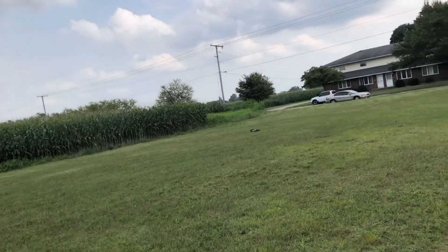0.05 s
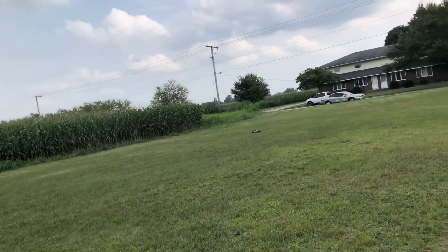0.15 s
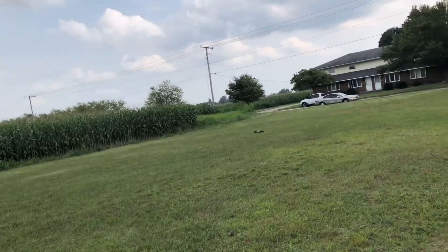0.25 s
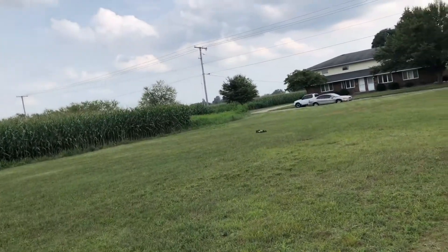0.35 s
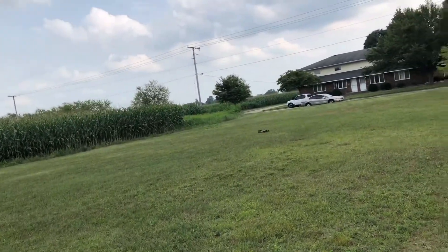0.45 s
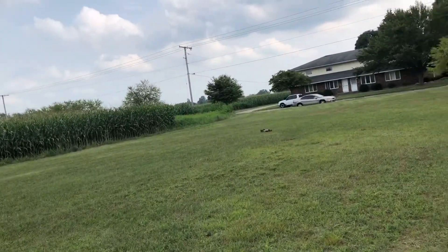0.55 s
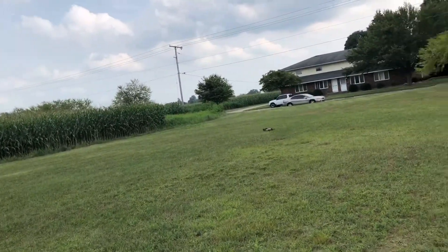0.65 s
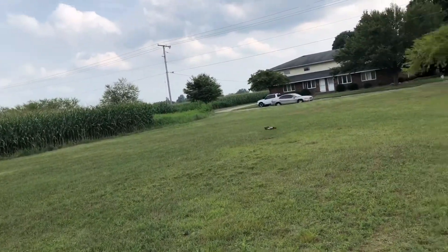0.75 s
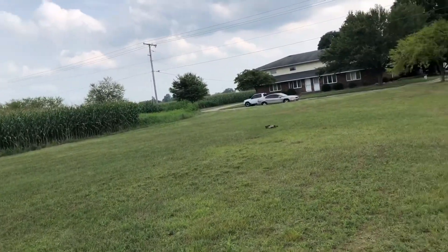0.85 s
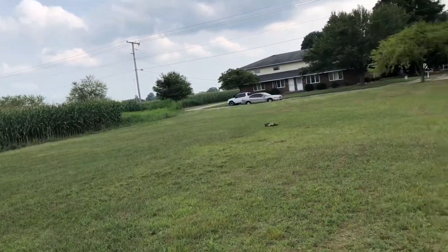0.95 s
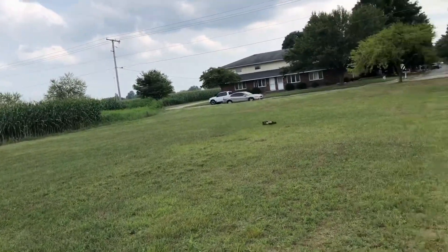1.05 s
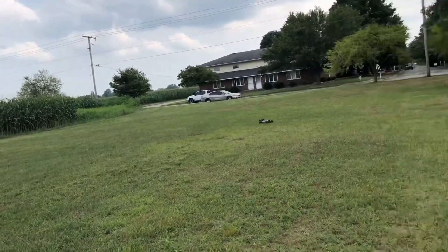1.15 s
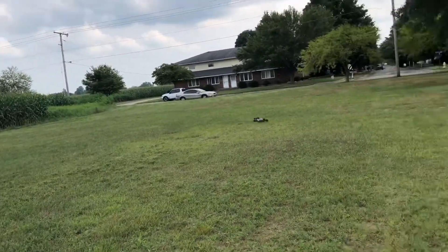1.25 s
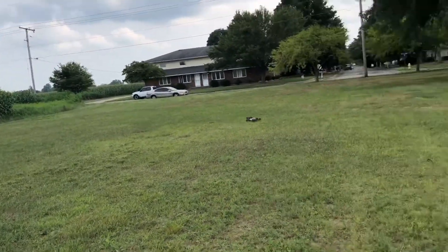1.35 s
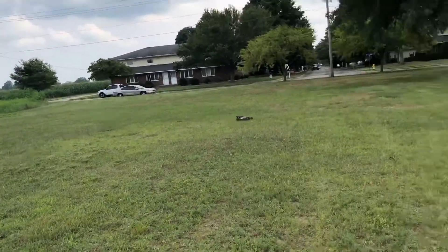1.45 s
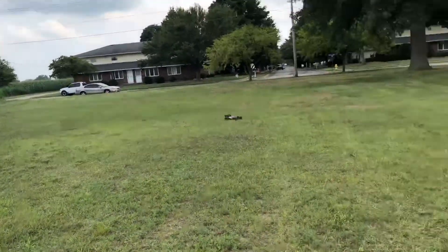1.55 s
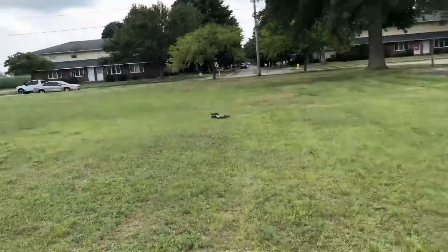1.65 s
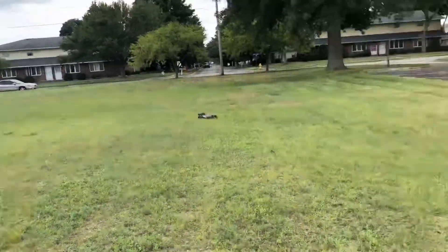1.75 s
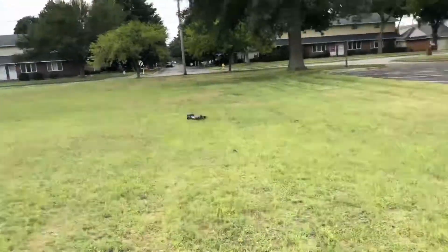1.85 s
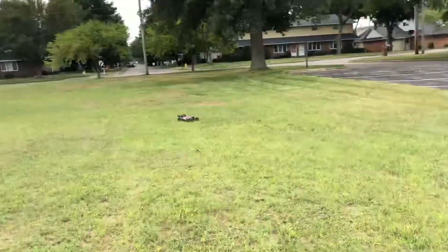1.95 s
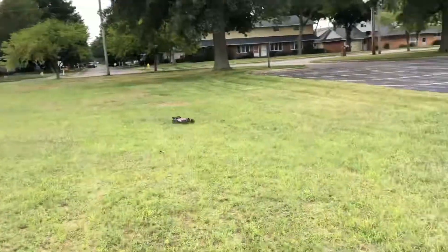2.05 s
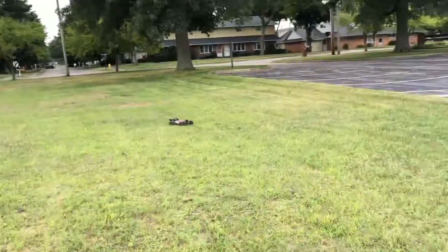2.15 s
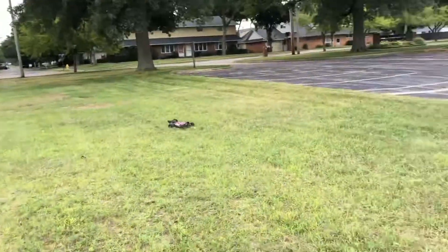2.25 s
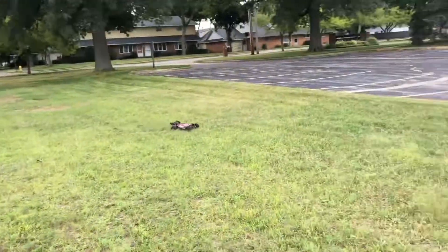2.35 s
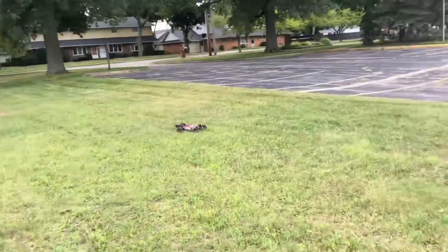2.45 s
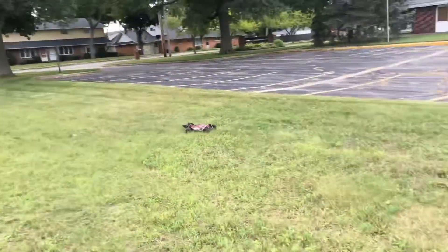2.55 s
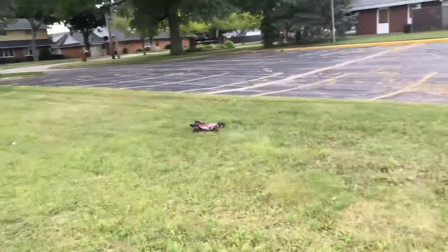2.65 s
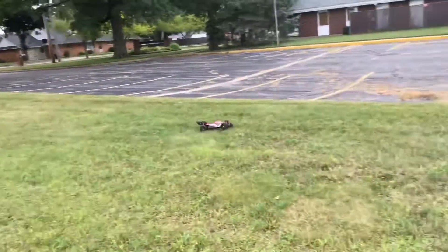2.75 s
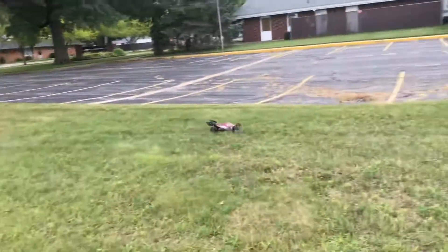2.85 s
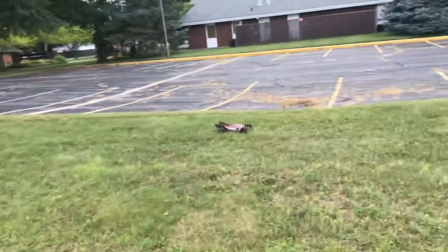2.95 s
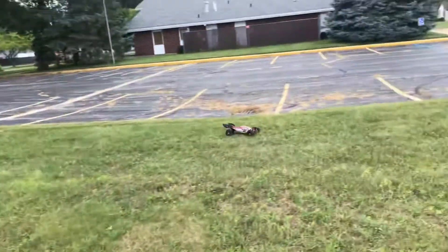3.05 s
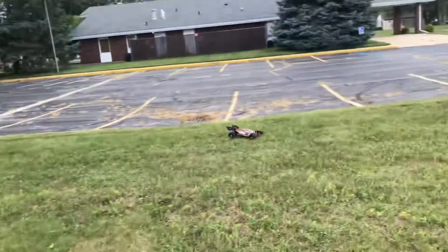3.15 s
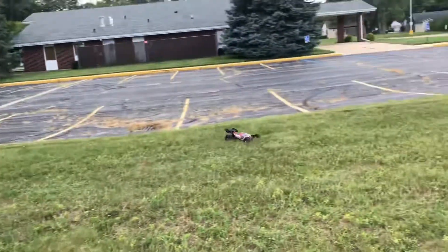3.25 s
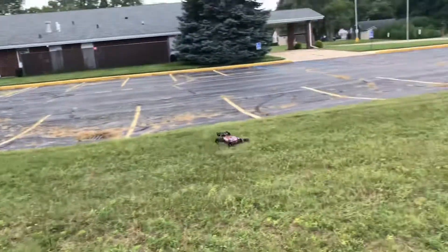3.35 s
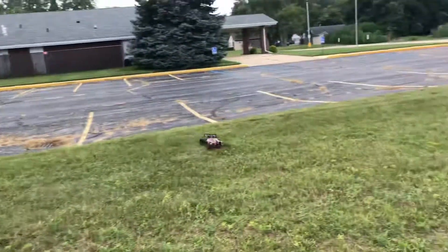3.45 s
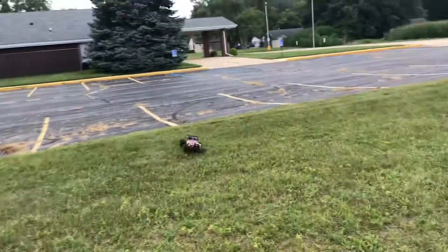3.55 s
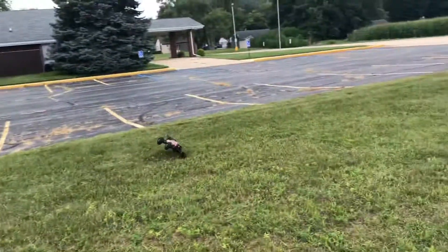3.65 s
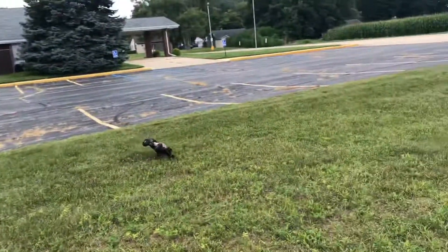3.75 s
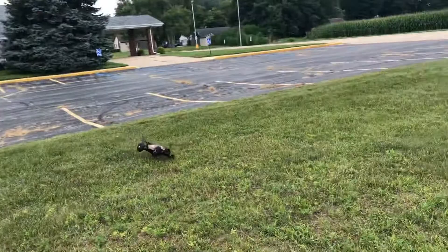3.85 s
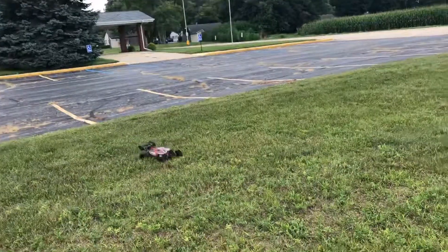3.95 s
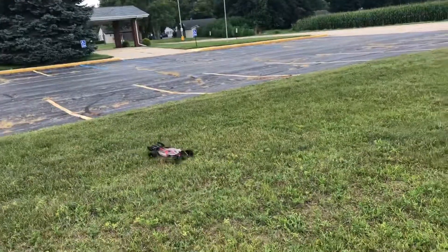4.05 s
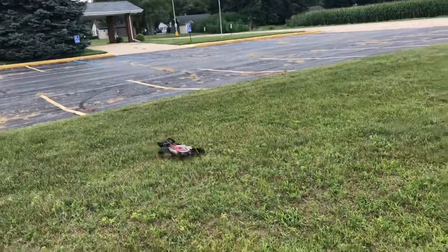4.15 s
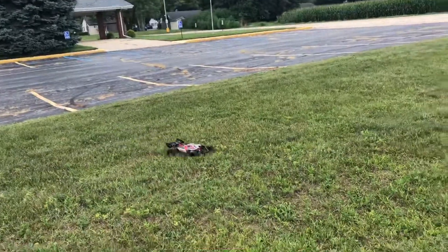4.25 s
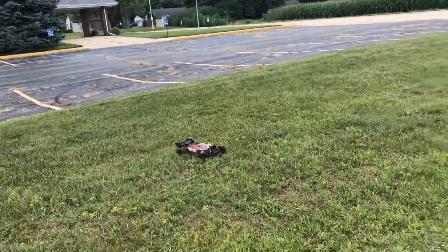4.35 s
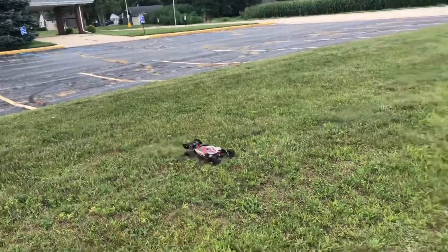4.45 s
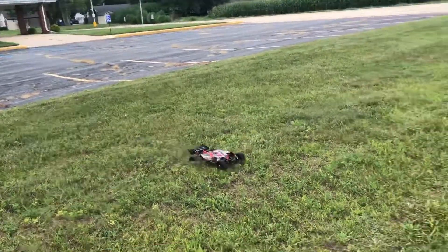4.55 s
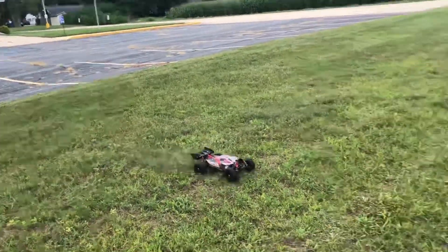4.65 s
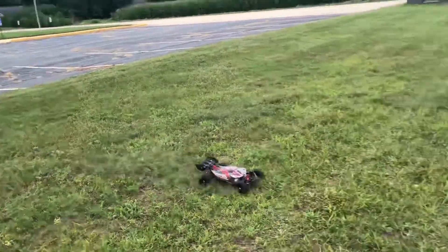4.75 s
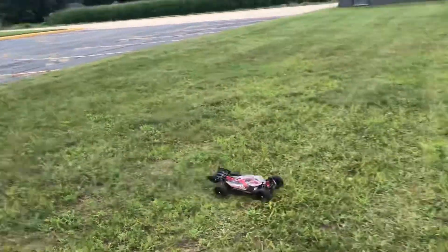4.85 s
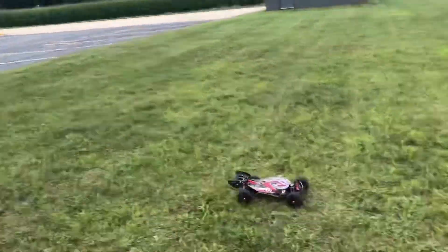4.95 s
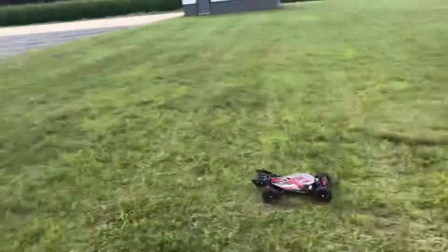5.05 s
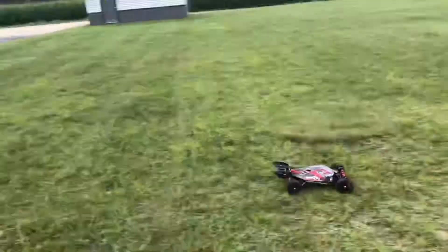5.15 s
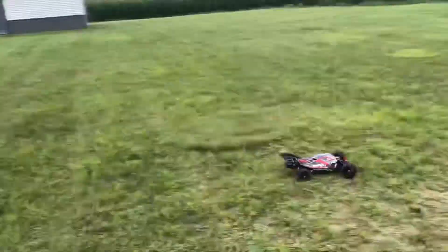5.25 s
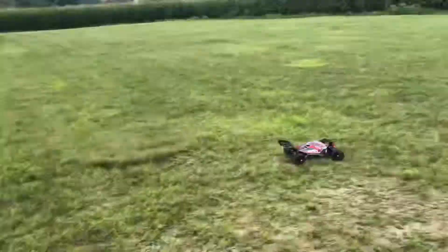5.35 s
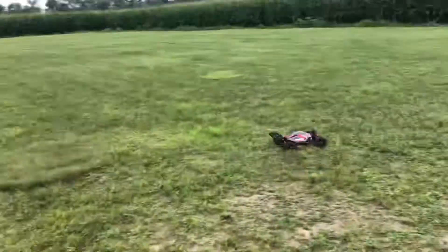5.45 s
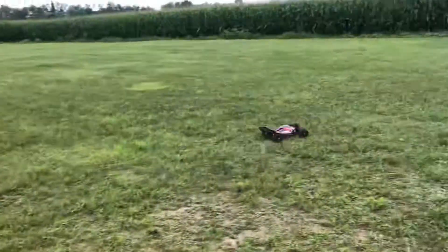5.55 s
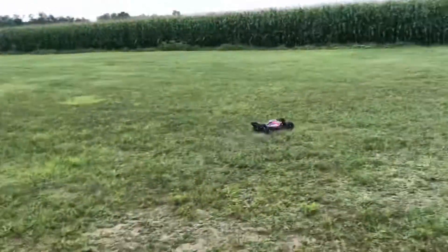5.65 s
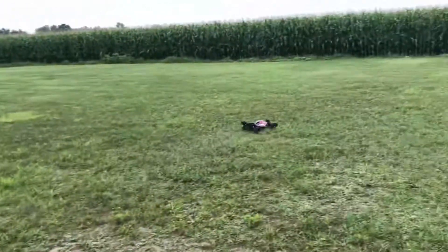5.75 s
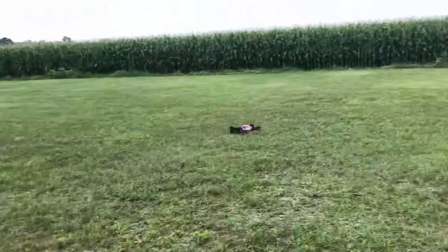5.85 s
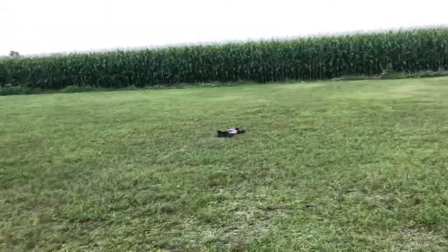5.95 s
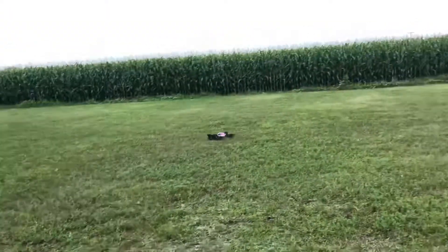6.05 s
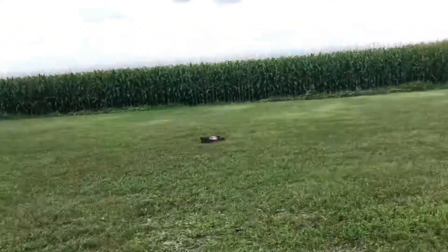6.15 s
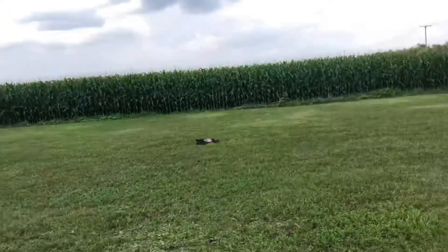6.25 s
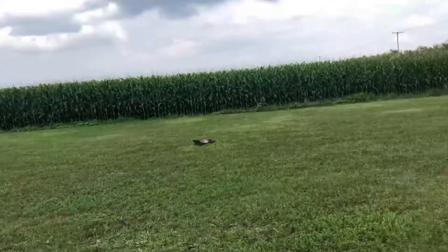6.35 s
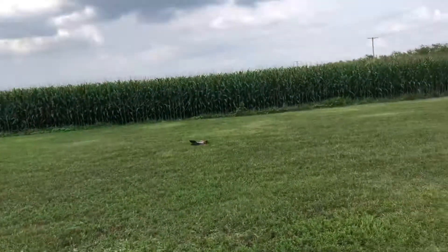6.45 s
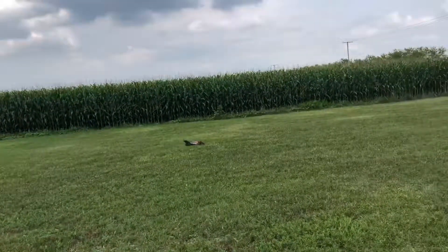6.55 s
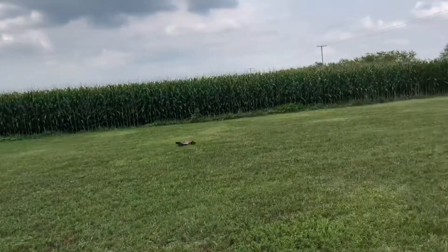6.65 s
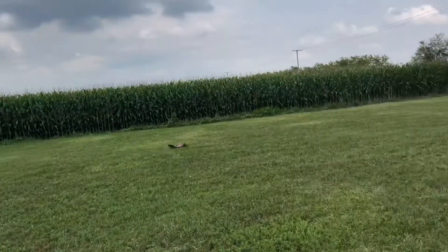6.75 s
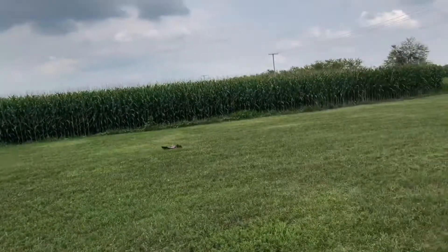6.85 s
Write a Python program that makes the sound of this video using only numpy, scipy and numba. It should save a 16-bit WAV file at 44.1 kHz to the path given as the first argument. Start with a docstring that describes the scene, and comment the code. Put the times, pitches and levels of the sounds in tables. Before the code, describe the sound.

A small electric buggy whines and rattles across grass, cutting its throttle twice, then roaring close past the microphone and fading away over quiet open country.

```python
"""A small electric buggy laps a lawn around a phone, in surges of throttle.
Its motor whines on multiples of its speed and the rotor hums; gear teeth rattle and hiss through the chassis.
Steel parts ring in the far treble, shifting in pitch with the motion, and tyres thrash the grass.
Stalks and bumps add short noise bursts; a quiet, steady noise of open country lies beneath."""
import sys
import numpy as np
from scipy import signal
from scipy.fft import rfft, irfft
from scipy.io import wavfile
from scipy.ndimage import uniform_filter1d
from numba import njit

SR = 44100
rng = np.random.default_rng(int(sys.argv[2]) if len(sys.argv) > 2 else 0)


def transcribe(u):
    """Save the signal u as a 16-bit wav file named by the first command-line argument.

    u: samples, shape (n,) or (channels, n), limited to [-1, 1]; the rate is SR.
    q: integer samples, one column per channel.
    """
    v = np.clip(np.atleast_2d(u).T, -1, 1)
    q = np.round(v * 32767).astype(np.int16)
    wavfile.write(sys.argv[1], SR, q)


N = 304548  # length in samples

# Motor through its surges, before hunting and loads: [t/s, commutation rate f/Hz,
# second multiple level/dB re rattle, first multiple level/dB re second, third multiple level/dB re second]
MOTOR_SURGES = [(0, 1692, -9, -9, -4), (.68, 1693, -13, -9, -6), (.715, 1710, -9, -13, -6),
                (.77, 1667, -8, -9, -4), (.8, 1530, -9, -7, 0), (.85, 1540, -13, -9, 3),
                (.93, 1616, -9, -2, 2), (1.0, 1690, -11, -13, -5), (1.07, 1710, -10, -9, 2),
                (1.13, 1850, -13, -2, 8), (1.19, 1736, -16, -4, 8), (1.3, 1614, -14, 0, -3),
                (1.36, 1550, -23, 0, -6), (1.63, 1196, -25, -9, 0), (1.65, 1215, -15, -12, 8),
                (1.68, 1226, -7, -12, -3), (1.72, 1384, -6, -12, -3), (1.75, 1462, -6, -12, 3),
                (1.775, 1540, -9, -12, 4), (1.79, 1643, -5, -10, -3), (1.84, 1700, -7, -8, -3),
                (1.87, 1740, -11, -9, 2), (1.9, 1560, -15, -12, -3), (1.955, 1646, -8, -10, -4),
                (2.0, 1567, -12, -12, -4), (2.04, 1830, -14, -2, -6), (2.09, 1713, -7, -6, -3),
                (2.13, 1800, -14, -10, -6), (2.17, 1810, -16, -8, 4), (2.2, 1860, -11, -8, -5),
                (2.245, 1720, 0, -5, -9), (2.295, 1625, -13, -8, 3), (2.33, 1692, -3, -10, -2),
                (2.38, 1830, -10, -1, -2), (2.43, 1698, -16, -4, 0), (2.49, 1786, -9, -12, -5),
                (2.54, 1782, -5, -13, -1), (2.56, 1654, -8, -6, 0), (2.625, 1627, -9, -6, -4),
                (2.665, 1800, -4, -10, -1), (2.7, 1880, -7, -14, 4), (2.73, 1813, -9, -8, -3),
                (2.81, 1713, -9, -8, -2), (2.9, 1743, -17, -5, 1), (3.25, 1738, -14.5, -8, -3),
                (3.3, 1635, -28, -8, -6), (3.33, 690, -28, -9, 9), (3.342, 720, -13, -18, 12),
                (3.365, 825, -20, -18, 9), (3.39, 1065, -21, -12, 14), (3.43, 1222, -20, -12, 7),
                (3.455, 1320, -7, -18, -3), (3.49, 1537, -3, -9, -2), (3.52, 1595, -1, -16, -5),
                (3.54, 1550, -1, -16, -1), (3.552, 1643, -4, -12, -8), (3.57, 1595, -7, -10, -6),
                (3.59, 1687, -0.5, -11, -5), (3.605, 1706, -10, -4, 0), (3.625, 1814, -11, 5, 3),
                (3.65, 1890, -12, 2, -10), (3.7, 1898, -27, -1, -6), (4.125, 689, -26, -9, 9),
                (4.138, 670, -7.5, -15, 10), (4.15, 900, -13, -15, 9), (4.16, 1100, -14, -15, 11),
                (4.18, 1228, -5, -15, 5), (4.19, 1370, 1, -14, -13), (4.205, 1476, -1, -5, -5),
                (4.213, 1520, -4, -4, 7), (4.222, 1632, 2.5, -18, -5), (4.236, 1710, -1, -16, -1),
                (4.252, 1770, -8, -8, -2), (4.27, 1575, -13, -12, 2), (4.288, 1603, -11, -11, 2),
                (4.31, 1720, -18, 3, -2), (4.39, 1796, -9, -2, -4), (4.412, 1815, -9, -9, -5),
                (4.428, 1670, -5, -14, -4), (4.45, 1690, -6, -5, -6), (4.47, 1595, -1, -9, 1),
                (4.492, 1730, -4.5, -16, -7), (4.512, 1835, -6, -19, -4), (4.55, 1904, -14, -20, -10),
                (4.59, 1847, -16, -1, -6), (4.62, 1735, -14.5, -10, -0.5), (4.9, 1748, -17, -1, -1),
                (5.1, 1726, -15, -5, -6), (5.3, 1705, -17.5, 0, 2), (5.5, 1745, -11, 6.5, -10),
                (5.95, 1744, -15.5, -16, -6), (6.0, 1627, -23, -3, -6), (6.5, 1160, -26, -6, 5),
                (6.52, 1204, -22, -6, 3), (6.69, 1740, -12, -3, 5), (6.705, 1750, -13, 6, 3),
                (6.8, 1765, -15, 6, 2), (6.91, 1767, -14, 10, 0)]
# Thick grass loading the motor: [t/s, sag f/Hz (below zero when the wheels slip free), length/s,
# whine gain level/dB]
GRASS_LOADS = [(0.168, 50, 0.046, 1.2), (0.431, 69, 0.037, 1.8), (.6, 1, 0.076, 8.3),
               (4.694, 4, 0.025, 8.5), (4.76, -0.5, 0.019, 5), (4.82, 71, 0.0303, 6.3),
               (4.895, 205.5, 0.033, 0.93), (5.11, 10, 0.025, 8), (5.17, -7.5, 0.012, 5.2),
               (5.3, 35.5, 0.021, 5.1), (5.43, -19, 0.019, 4), (5.84, 119.5, 0.059, 4.2)]
# Loudness of the moving parts: [t/s, gear rattle level/dB, then re rattle: tyres in the grass level/dB,
# gear hiss level/dB, rotor hum level/dB]
DRIVE_LEVELS = [(0.0, -49.5, -33, 2.5, -18), (0.45, -48.5, -10, 0.5, -10), (1.2, -45, -3, 3.5, -9),
                (1.3, -44, -3, -0.5, -17), (1.39, -54, 1.5, 6, -6), (1.6, -50.5, -2.5, 3.5, -5),
                (1.74, -44, -6, 3.5, -14), (1.92, -38.5, -4.5, 2, -8.5), (2.3, -37, -3.5, 1, -12),
                (2.8, -34, -3.5, 1, -8.5), (2.93, -39.5, -4, 1.5, -21), (3.3, -49.5, 1.5, 1, -16),
                (3.42, -37, -9.5, 0, -28), (3.52, -33, -13.5, -3, -13.5), (3.62, -30.5, -12.5, -1.5, -19),
                (3.75, -31, -12.5, -2, -62), (3.92, -37.5, -8.5, -2, -13), (3.96, -44.5, 0, 3, -1),
                (3.985, -57, 8, 3, -17), (4.1, -59, 3, -15, -18), (4.122, -45.5, -6, 6, -30),
                (4.14, -39.5, -2.5, 2.5, -37), (4.22, -36, -3.5, 4, -24), (4.27, -30.5, -10, -2, -10),
                (4.6, -26.5, -6.5, -2.5, -16.5), (5.1, -25, -4, -1.5, -10.5), (5.3, -28, -1.5, -1.5, -7.5),
                (5.62, -34, -1.5, 2.5, -11.5), (5.96, -36.5, -4.5, 1, -12.5), (6.1, -45.5, -2.5, 1, -5),
                (6.48, -54.5, -1, 1, -35), (6.55, -48, -5, 0, -30), (6.62, -43.5, -10.5, 2.5, -26),
                (6.7, -40, -8, 3, -14), (6.8, -41, -6.5, 5.5, -14), (6.91, -41.5, -7, 4, -10)]
# Side the buggy shows: [t/s, side (0 nose, 1 near flank, 2 tail, 3 far flank)]
SIDE_SHOWN = [(0, 0.089), (1.3, 0.14), (1.8, 0.53), (2.4, 0.31), (2.8, 1.66), (3.3, 1.16), (3.5, 1.04),
              (3.75, 0.58), (4.2, 0.89), (4.7, 0.6), (5.05, 2.38), (5.4, 1.9), (6, 1.84), (6.45, 2.33),
              (6.65, 3.2), (6.91, 2.8)]
# Resonances (modes) of the gear case, gear teeth and tyres, before motion and wander:
# [f/Hz, width f/Hz, then relative level/dB heard from nose, near flank, tail, far flank]
CASE_MODES = [(1308, 80, -3, -9.5, -17.5, -9), (2126, 87, -3.5, -8.5, -9.5, -8),
              (2534, 154, -22, -8, -8.5, -3), (2800, 430, -12.5, -1, -0.5, -16),
              (3190, 450, 0.5, 1, -0.5, 1.5), (3600, 170, -9, 0, -6.5, -2),
              (4280, 160, -7, -4.5, -2.5, 4.5), (4502, 160, -3.5, -4.5, -9, -3),
              (4710, 88, -25, -10, -3, -.5), (5400, 150, -1, -15, -6, 2), (5745, 200, 0, -5, 0, -3)]
TEETH_MODES = [(6465, 260, -20, -11, -9, -8), (6855, 660, -0.5, -9, 1.5, -7),
               (7220, 410, -7.5, -9, -7.5, -10), (8450, 330, -8, -14, 2.5, -9),
               (8900, 510, -4.5, -5.5, -29, -5), (9145, 500, 1.5, -5, 2, -15)]
TYRE_MODES = [(535, 85, -4, 1.5, -15, -6), (663, 207, 2, 4.5, 3.5, 10), (800, 150, 2, -20, -3, -49),
              (970, 220, 2.5, -9, -5, -39)]
# Growl of the case and rasp of the gears, before wander: [t/s, growl level/dB re rattle,
# rasp level/dB re rattle, growl f/Hz before the motion shifts it]
GROWL_AND_RASP = [(0, -8.5, -5, 1720), (1.1, -6.5, -8, 1700), (1.3, -0.5, -8, 1700), (1.7, -14, -3, 1697),
                  (2.0, -6.5, -7.5, 1724), (2.5, -7, -4.5, 1653), (2.9, -10.5, -3, 1636),
                  (3.45, -18, -5, 1640), (3.58, -5, -14, 1817), (3.7, -3, -25, 1860), (3.85, -14, -2, 1680),
                  (4.2, -12, -7, 1673), (4.4, -10, -15, 1701), (4.7, -8, -20, 1677), (4.9, -9, -16, 1690),
                  (5.05, -9, -20, 1692), (5.25, -4.5, -11.5, 1722), (5.7, -8.5, -2, 1760),
                  (6.0, -11, -8.5, 1715), (6.66, -16, -1, 1767), (6.72, -6, -1, 1795),
                  (6.91, -15, -1, 1793)]
# Steel ring, shifted by the motion: [t/s, lower ring f/Hz, lower ring level/dB re rattle,
# upper ring level/dB re lower, before a fixed 6 dB boost]
STEEL_RING = [(0.0, 14850, -7, -10), (1.2, 14860, -6, -9), (1.5, 14870, 0, -5), (2.0, 14780, -6, -9),
              (2.75, 14670, -8, -7), (3.0, 14500, -7, -7), (3.3, 14900, -6, -8), (3.36, 14940, 0, -8),
              (3.42, 14800, -12, -6), (3.5, 14600, -14, -2), (3.62, 14500, -10, -8), (3.72, 14700, -8, -8),
              (3.82, 14430, -9, -6), (3.92, 14850, -3, -4), (4.12, 14960, -6, 0), (4.2, 15150, -5.5, 6),
              (4.3, 14930, -8, 8), (4.7, 15120, -8, -13), (5.0, 14620, -7, -10), (5.35, 14390, -5, -4),
              (5.7, 14450, 2, -20), (5.95, 14170, -12, -4), (6.25, 14100, -3, -6), (6.6, 14460, -8, -8),
              (6.72, 14300, -1, -10), (6.91, 14450, 3, -17)]
# Shape of the country noise: [f/Hz, relative level/dB per Hz]
FIELD_SPECTRUM = [(18, -37), (30, 2), (137, 3.5), (728, -6), (1470, -14.5), (1680, -6), (2360, -13.5),
                  (5170, -9.5), (13600, -13.5), (15500, -8.5)]
# Grass stalks snapping and bumps under the chassis: [t/s, level/dB before fading, centre f/Hz,
# time to fade by 26 dB/s]
KNOCKS = [(0.792, -24, 9000, 0.0031), (1.468, -30, 9500, 0.0035), (3.914, -30.5, 700, 0.037),
          (3.917, -28, 11000, 0.023), (3.957, -31, 3100, 0.01), (4.635, -19, 6510, .02),
          (4.655, -20, 4300, 0.043), (5.086, -20, 4000, 0.016), (5.688, -23, 6730, 0.007),
          (5.76, -35, 167, 0.13), (6.515, -41.5, 890, 0.063)]

HUNT_HZ, HUNT_PER_S = 12, 24  # the motor rate hunts over the ground: spread, new levels per second
RACE_SHARE, RACE_LAG = .65, 2.3  # overshoot as a share of the sag, so many lengths later
INERTIA_S = .006  # averaging time; the rotor rounds the surges
FOURTH_DB = -10  # fourth multiple re the third
ROTOR_HZ, ROTOR_HUNT_HZ, ROTOR_PATCHY_DB = 273, 13, 2.5  # centre, spread of pitch, spread of level
GROWL_WIDTH_HZ = 230.
RASP_HZ, RASP_WIDTH_HZ = 5150., 400.
RING_REST_HZ, UPPER_RING_HZ, RING_WIDTH_HZ, RING_PATCHY_DB = 14700., 15740., 300, 2
RUMBLE_DB, RUMBLE_SLOPE, RUMBLE_PATCHY_DB = -31.5, 0.5, 2.5  # base, dB per dB of the tyres, spread
FIELD_DB = -45.5  # level around which the country noise wavers
TOP_HZ = 15745  # upper limit of the phone


def gain(db):
    """Turn decibels into a plain multiplier."""
    return 10 ** (np.asarray(db) / 20)


def unit(x):
    """Scale a sound to an average strength (rms) of 1."""
    return x / np.sqrt(np.mean(x ** 2))


def columns(table):
    """Draw each column of a timed table as a curve, one value a sample."""
    s, *rest = np.transpose(table)
    return [np.interp(np.arange(N) / SR, s, c) for c in rest]


@njit
def moving_bandpass(x, g, k):
    """Keep the sound near a moving centre, with gain 1 there, using two linked stores (a state-variable filter)."""
    y, band_store, low_store = np.empty(len(x)), 0., 0.
    for i in range(len(x)):
        v = (band_store + g[i] * (x[i] - low_store)) / (1 + g[i] * (g[i] + k))
        band_store = 2 * v - band_store
        low_store = low_store + 2 * g[i] * v
        y[i] = k * v
    return y


def resonance(x, hz, width, shift=1.):
    """Ring one resonance at hz, moved by the factor shift."""
    centre_hz = np.minimum(hz * shift * np.ones(N), .45 * SR)
    return moving_bandpass(x, np.tan(np.pi * centre_hz / SR), max(width / hz, .002))


def steep_resonance(x, hz, width, shift):
    """Pass through a resonance twice for steep skirts; rms 1."""
    wide = 1.55 * width  # two passes narrow the band, so start wider
    return unit(resonance(resonance(x, hz, wide, shift), hz, wide, shift))


def passband(x, lo_hz, hi_hz):
    """Keep a broad, fixed range of pitch; rms 1."""
    return unit(signal.sosfilt(signal.butter(2, [lo_hz, hi_hz], "bandpass", fs=SR, output="sos"), x))


def walk(rate):
    """Wander at random: rate new levels a second, smoothed twice, rms 1."""
    k = int(SR / rate)
    steps = np.repeat(rng.standard_normal(N // k + 1), k)
    return unit(uniform_filter1d(uniform_filter1d(steps, k), k)[:N])


def rough_tone(hz, wobble, blur_hz, clean, broken_db):
    """A tone of rms near 1 whose pitch shakes at random and whose strength breaks up at random."""
    phase = 2 * np.pi * np.cumsum(hz * (1 + wobble * walk(150))) / SR
    blurred = (clean + walk(blur_hz)) * np.sin(phase) + walk(blur_hz) * np.cos(phase)
    return gain(broken_db * walk(45)) * blurred


def motor_state():
    """Surges set the motor's rate; its inertia rounds them, and loads make it sag and then race."""
    t = np.arange(N) / SR
    hz, whine_db, first_db, third_db = columns(MOTOR_SURGES)
    hz = uniform_filter1d(hz, int(INERTIA_S * SR)) + HUNT_HZ * walk(HUNT_PER_S)
    for s, sag_hz, length, db in GRASS_LOADS:
        u = (t - s) / length
        race = RACE_SHARE * np.exp(-(u - RACE_LAG) ** 2)
        hz = hz - sag_hz * (np.exp(-u ** 2) - race)
        whine_db = whine_db + db * np.exp(-u ** 2 / 2)  # it sings out under load
    return hz, whine_db, first_db, third_db


def motor_whine():
    """Magnetic pull whines on the first four multiples of the commutation rate."""
    hz, whine_db, first_db, third_db = motor_state()
    first, second, third, fourth = (rough_tone(k * hz, .011, 260, .9, 1.3) for k in (1, 2, 3, 4))
    upper = gain(third_db) * (third + gain(FOURTH_DB) * fourth)
    return gain(whine_db) * (gain(first_db) * first + second + upper)


def rotor_hum(hum_db):
    """The unbalanced rotor hums low, with wandering pitch and level."""
    hum = rough_tone(ROTOR_HZ + ROTOR_HUNT_HZ * walk(12), .03, 100, .5, 1.)
    return gain(hum_db + ROTOR_PATCHY_DB * walk(22.17)) * hum


def motor():
    """Whine and hum together follow the rattle level."""
    rattle_db, _, _, hum_db = columns(DRIVE_LEVELS)
    return gain(rattle_db) * (motor_whine() + rotor_hum(hum_db))


def ground_bumps():
    """Bumps of the ground: quick random swells with the slow drift partly removed."""
    jolts = walk(230)
    return gain(1.6 * unit(jolts - .6 * uniform_filter1d(jolts, SR // 30)))


def clatter(bumps):
    """Dense impacts of uneven size, swelling with the bumps of the ground."""
    size = gain(1.6 * rng.exponential(size=N))
    return rng.standard_normal(N) * size * bumps


def body(bumps, modes, broad_share, lo_hz, hi_hz, shift):
    """Impacts ring the modes, each heard by the side the buggy shows, and also radiate broadly."""
    side = columns(SIDE_SHOWN)[0]
    impacts = clatter(bumps)
    rung = np.zeros(N)
    for hz, width, *side_db in modes:
        level_db = np.interp(side, range(len(side_db)), side_db) + 2.0 * walk(10)
        bend = 1 + .02 * walk(14)  # the chassis flexes and the modes wander
        rung += gain(level_db) * steep_resonance(impacts, hz, width, shift * bend)
    return unit(unit(rung) + broad_share * passband(clatter(bumps), lo_hz, hi_hz))


def growl_and_rasp(bumps, shift):
    """Impacts ring a low growl in the case and a higher rasp in the gears; both levels wander."""
    growl_db, rasp_db, growl_hz = columns(GROWL_AND_RASP)
    middle_hz = growl_hz.mean()
    growl = steep_resonance(clatter(bumps), middle_hz, GROWL_WIDTH_HZ, shift * growl_hz / middle_hz)
    rasp = unit(resonance(clatter(bumps), RASP_HZ, RASP_WIDTH_HZ, shift))
    return gain(growl_db + 1.8 * walk(14)) * growl + gain(rasp_db + 1.8 * walk(14)) * rasp


def steel_ring(bumps, shift, ring_db, upper_db):
    """Impacts ring steel parts at two treble pitches, each patchy in level."""
    lower, upper = (gain(RING_PATCHY_DB * walk(10)) * unit(resonance(clatter(bumps), hz, RING_WIDTH_HZ, shift))
                    for hz in (RING_REST_HZ, UPPER_RING_HZ))
    return gain(ring_db) * (lower + gain(upper_db + 6.0) * upper)


def rumble(bumps, rattle_db, tyre_db):
    """Low impact noise grows more gently than the tyres do."""
    rumble_db = RUMBLE_DB + RUMBLE_SLOPE * (rattle_db + tyre_db) + RUMBLE_PATCHY_DB * walk(13)
    return gain(rumble_db) * passband(clatter(bumps), 75, 470)


def drive():
    """Gears, steel, tyres and chassis share the same ground bumps and motion."""
    rattle_db, tyre_db, hiss_db, _ = columns(DRIVE_LEVELS)
    ring_hz, ring_db, upper_db = columns(STEEL_RING)
    shift = ring_hz / RING_REST_HZ  # approaching raises every resonance, leaving lowers it
    bumps = ground_bumps()
    rattle = body(bumps, CASE_MODES, 0.76, 1100, 5440, shift)
    hiss = body(bumps, TEETH_MODES, 0.91, 5700, 11960, shift)
    tyres = body(bumps, TYRE_MODES, 0.73, 348, 1330, shift)
    case = rattle + growl_and_rasp(bumps, shift) + gain(hiss_db) * hiss
    ring = steel_ring(bumps, shift, ring_db, upper_db)
    return gain(rattle_db) * (case + gain(tyre_db) * tyres + ring) + rumble(bumps, rattle_db, tyre_db)


def field():
    """Far traffic, breeze and leaves: steady noise that wavers a little."""
    hz, db = np.transpose(FIELD_SPECTRUM)
    grid_hz = np.maximum(np.arange(N // 2 + 1) * SR / N, 1)
    shape = gain(np.interp(np.log(grid_hz), np.log(hz), db))
    noise = irfft(rfft(rng.standard_normal(N)) * shape, N)
    return gain(FIELD_DB + 1.1 * walk(2.5)) * unit(noise)


def knocks():
    """Snapping stalks and bumps: short bursts of noise around a centre, fading fast."""
    out, t = np.zeros(N), np.arange(4096) / SR
    for s, db, hz, decay_s in KNOCKS:
        burst = passband(rng.standard_normal(len(t)), hz / 1.8, min(hz * 1.8, 15000))
        i = int(s * SR)
        out[i:i + len(t)] += gain(db) * burst * np.exp(-t / max(decay_s / 3, 1e-4))
    return out


def scene():
    """Add the buggy, the open country and the knocks into one channel."""
    return (motor() + drive() + field() + knocks())[None]


def record(dry):
    """The phone drops the deep bass and cuts the top."""
    dry = signal.sosfilt(signal.butter(4, 50, "highpass", fs=SR, output="sos"), dry)
    return signal.sosfilt(signal.ellip(16, .3, 80, TOP_HZ, fs=SR, output="sos"), dry)


dry = scene()
out = record(dry)
transcribe(out)
```